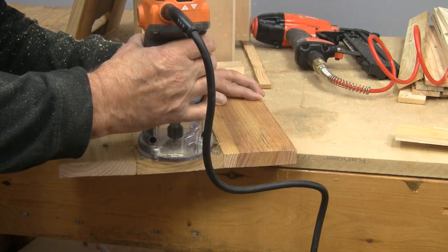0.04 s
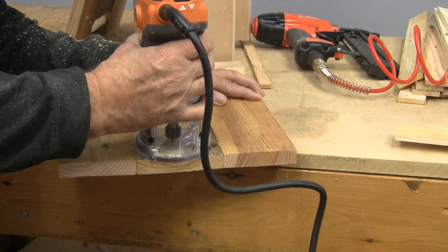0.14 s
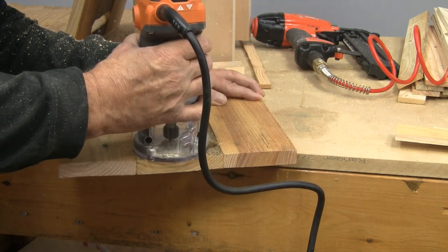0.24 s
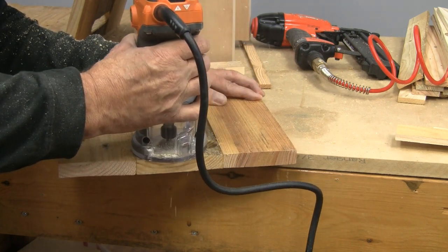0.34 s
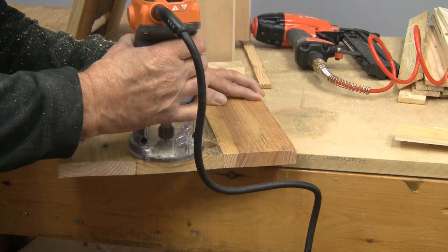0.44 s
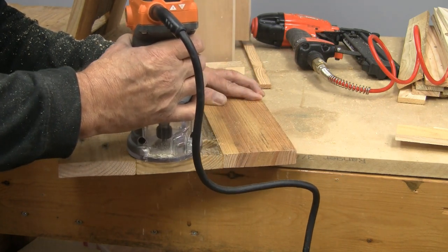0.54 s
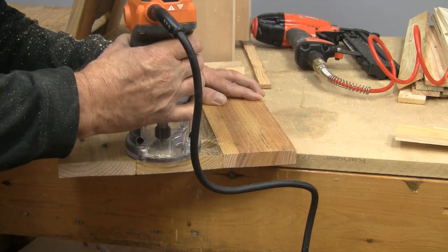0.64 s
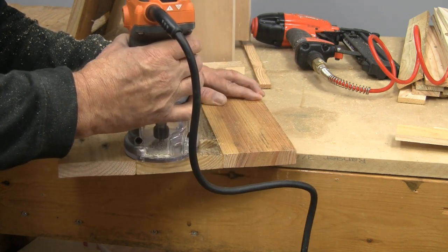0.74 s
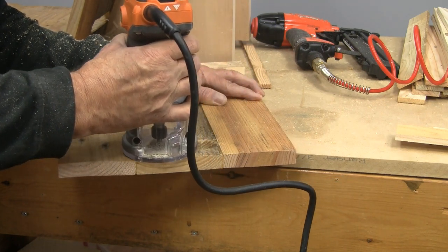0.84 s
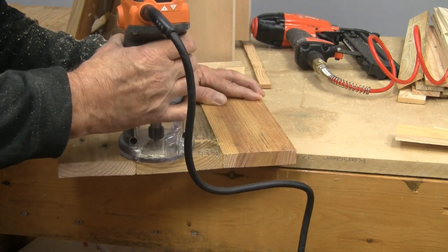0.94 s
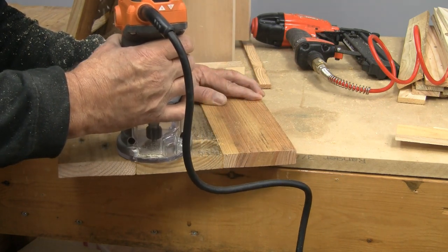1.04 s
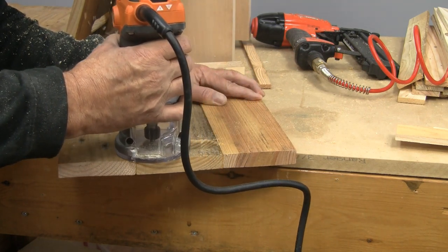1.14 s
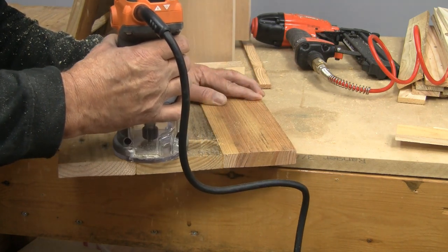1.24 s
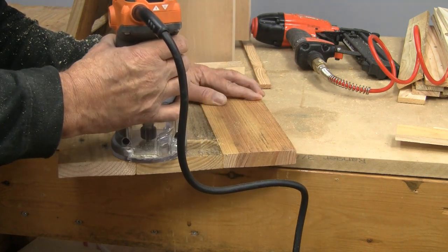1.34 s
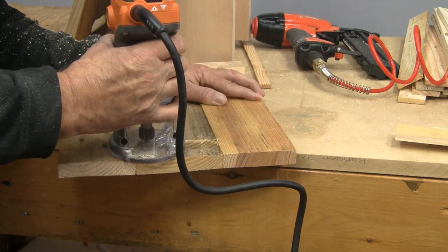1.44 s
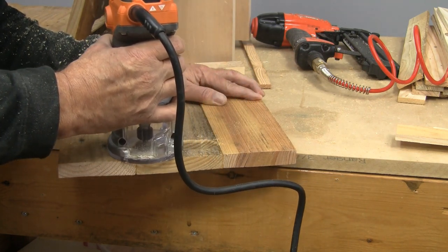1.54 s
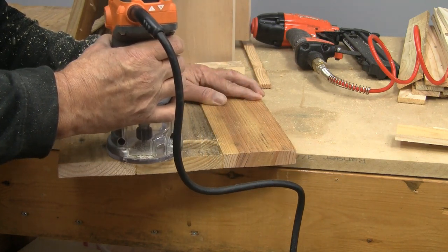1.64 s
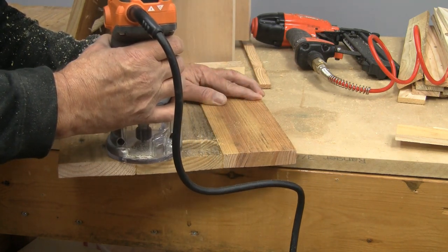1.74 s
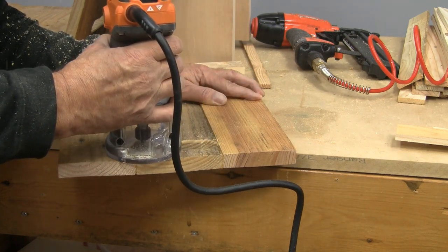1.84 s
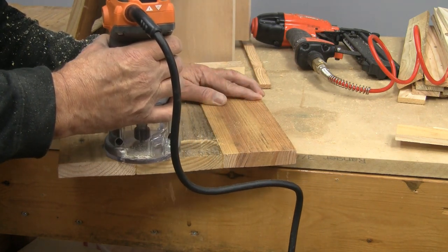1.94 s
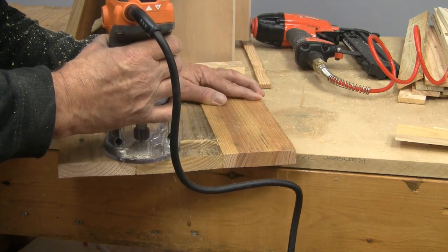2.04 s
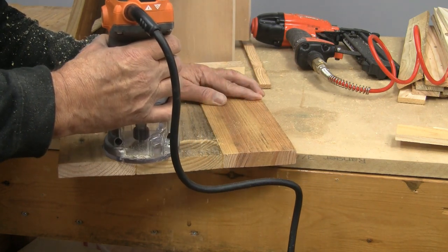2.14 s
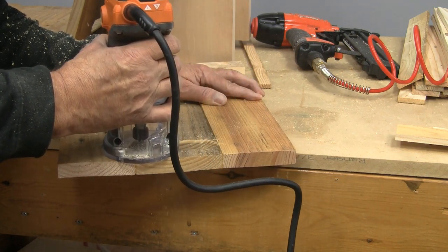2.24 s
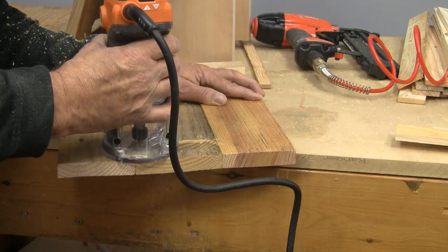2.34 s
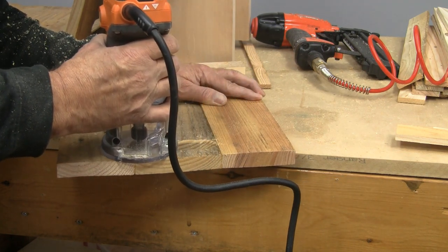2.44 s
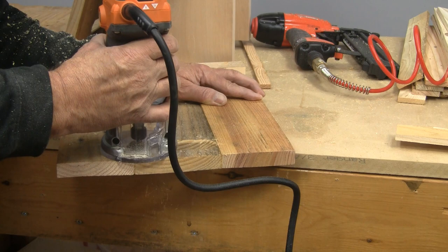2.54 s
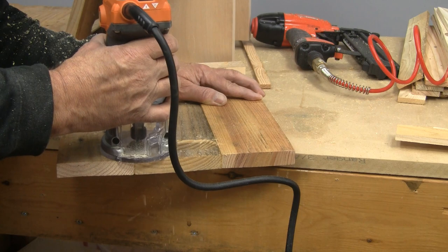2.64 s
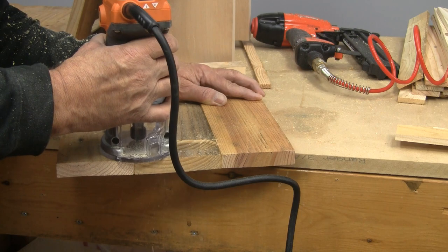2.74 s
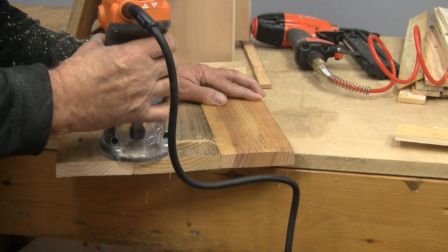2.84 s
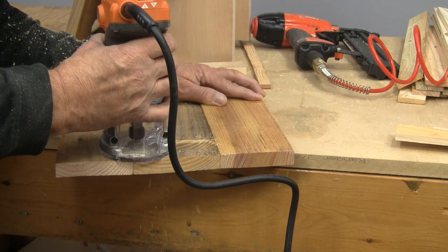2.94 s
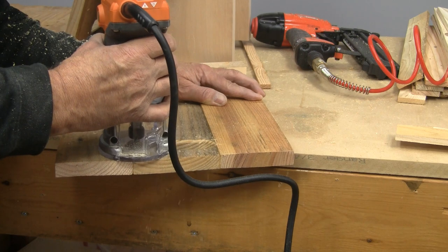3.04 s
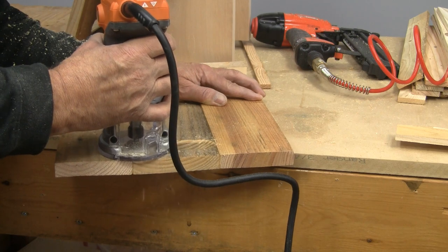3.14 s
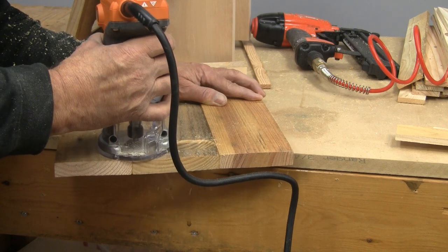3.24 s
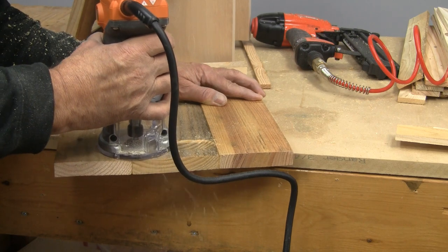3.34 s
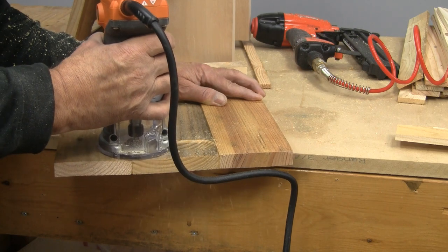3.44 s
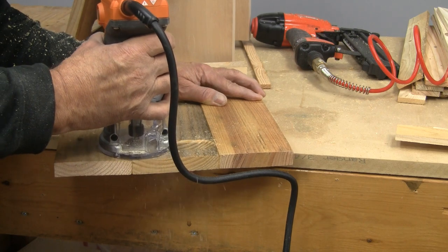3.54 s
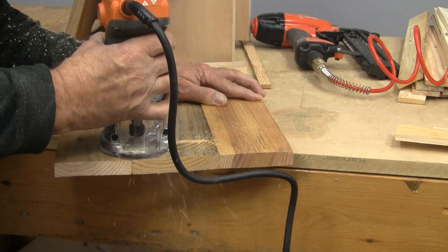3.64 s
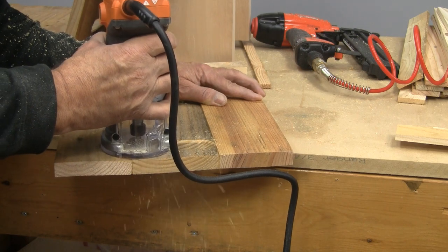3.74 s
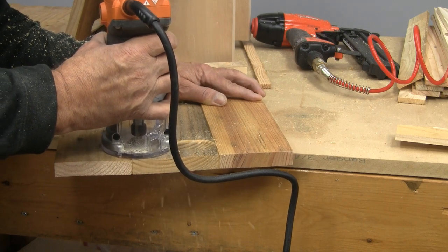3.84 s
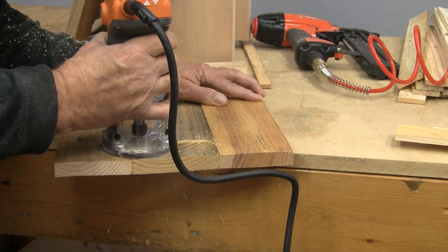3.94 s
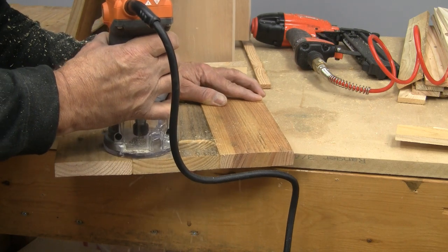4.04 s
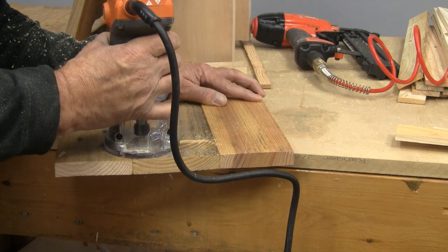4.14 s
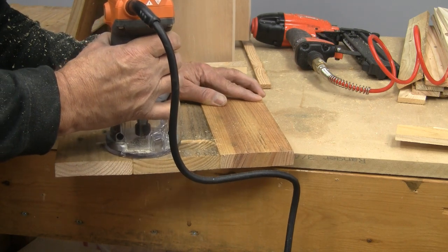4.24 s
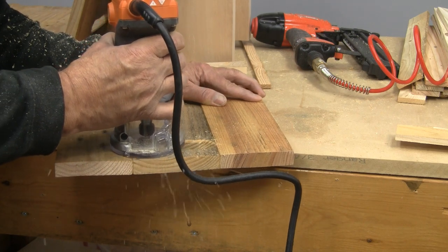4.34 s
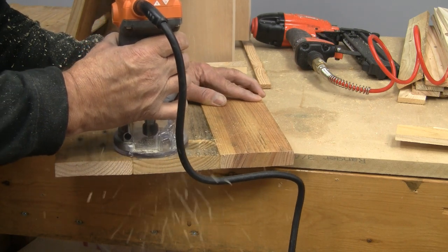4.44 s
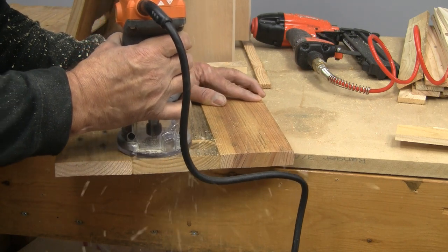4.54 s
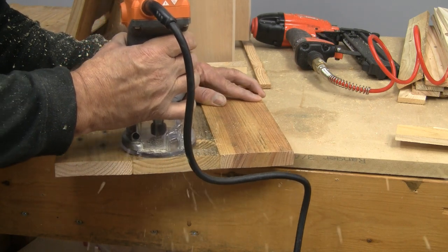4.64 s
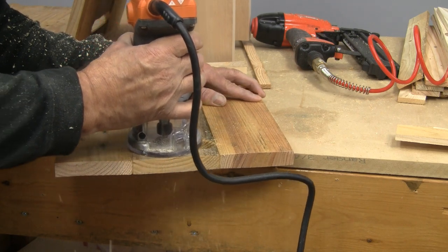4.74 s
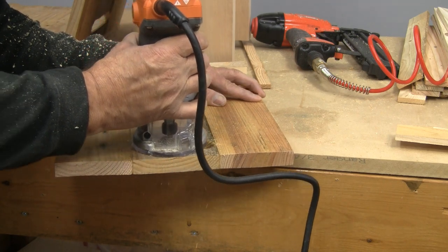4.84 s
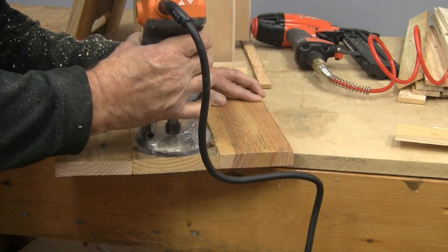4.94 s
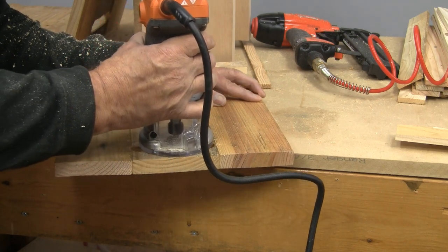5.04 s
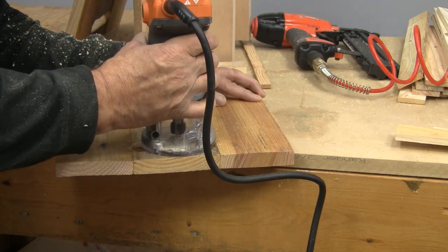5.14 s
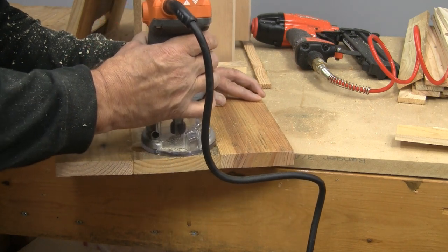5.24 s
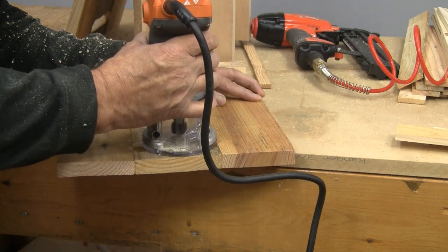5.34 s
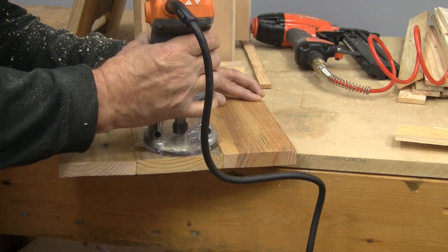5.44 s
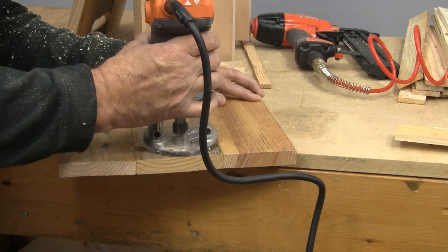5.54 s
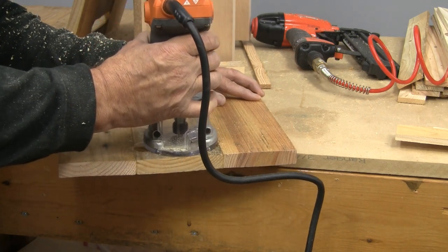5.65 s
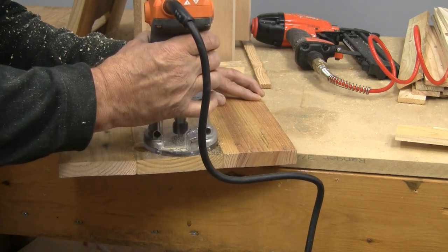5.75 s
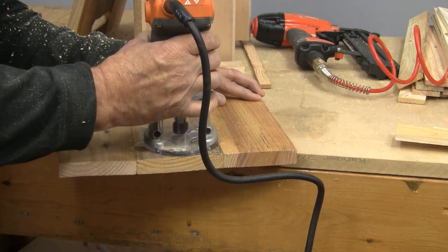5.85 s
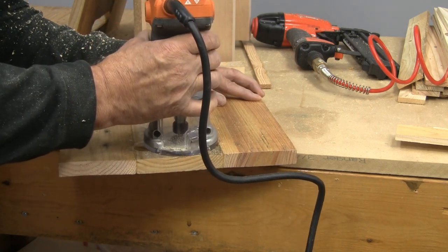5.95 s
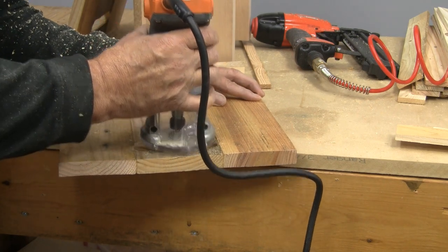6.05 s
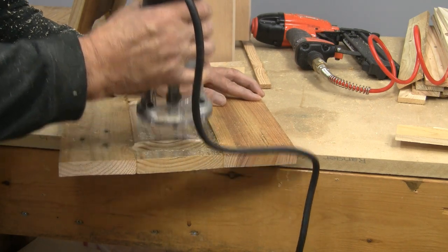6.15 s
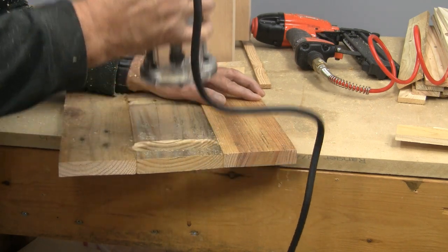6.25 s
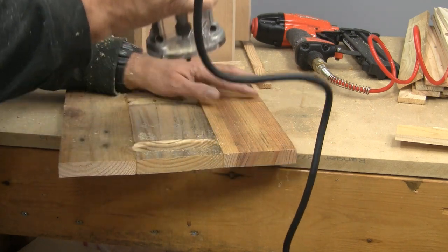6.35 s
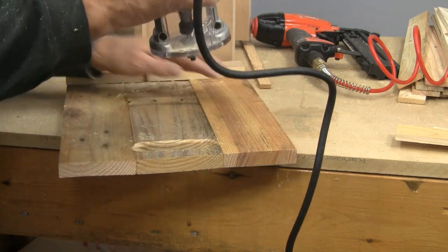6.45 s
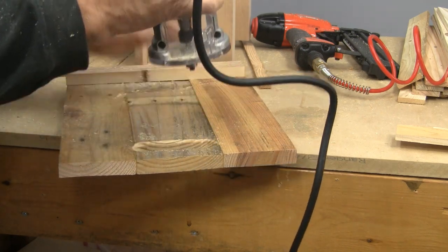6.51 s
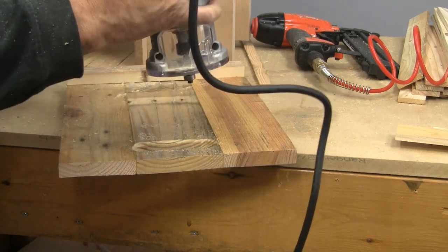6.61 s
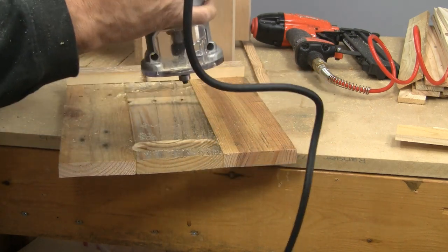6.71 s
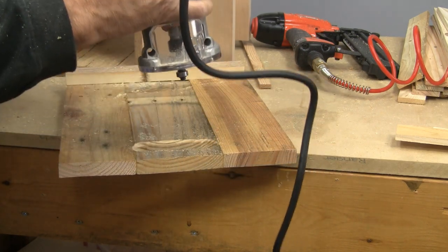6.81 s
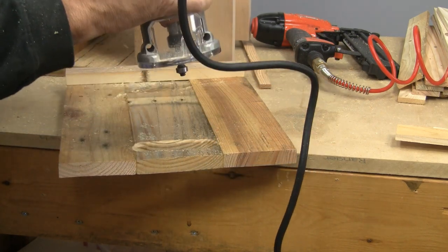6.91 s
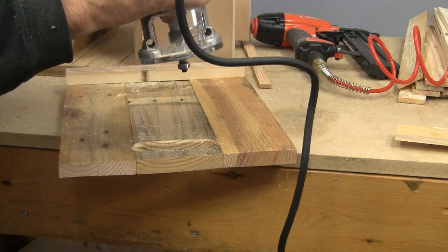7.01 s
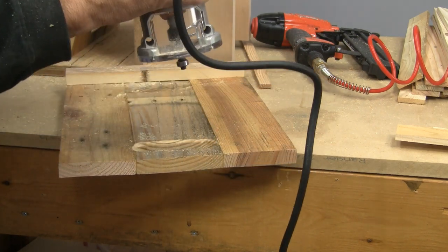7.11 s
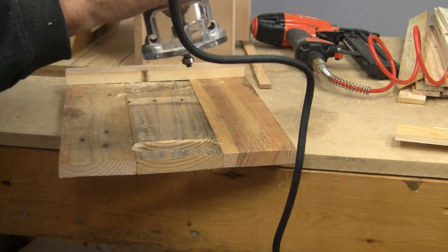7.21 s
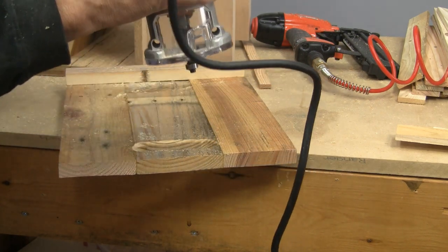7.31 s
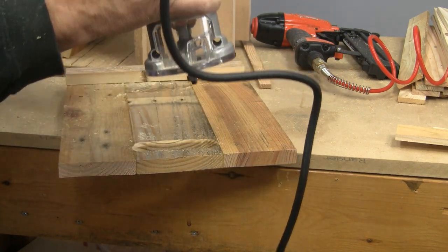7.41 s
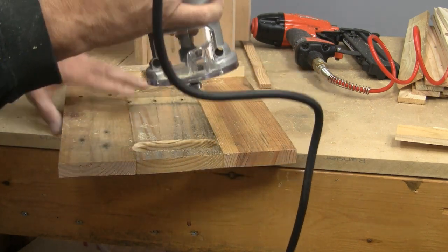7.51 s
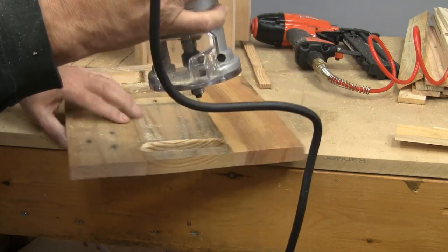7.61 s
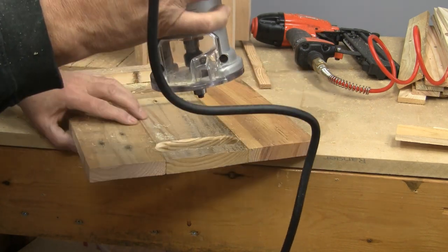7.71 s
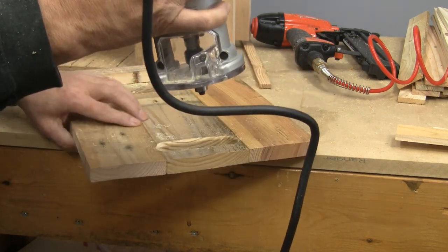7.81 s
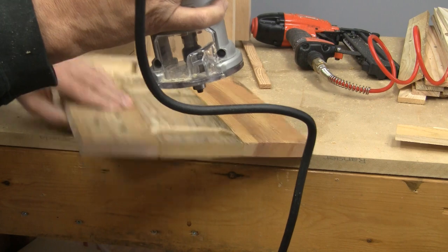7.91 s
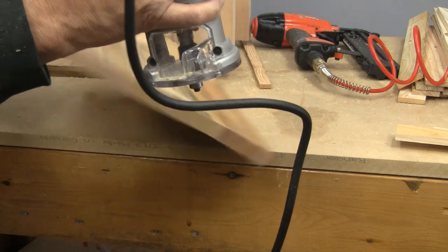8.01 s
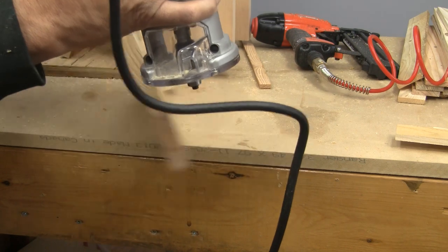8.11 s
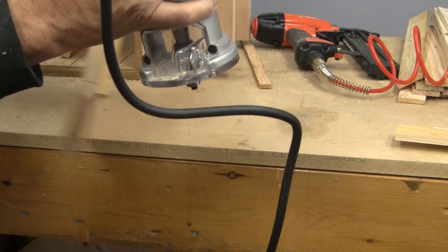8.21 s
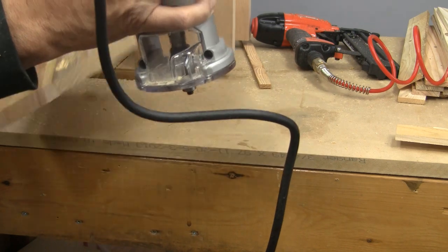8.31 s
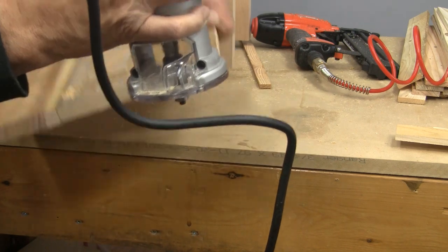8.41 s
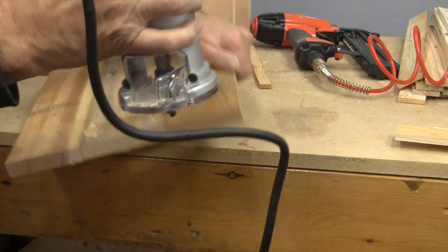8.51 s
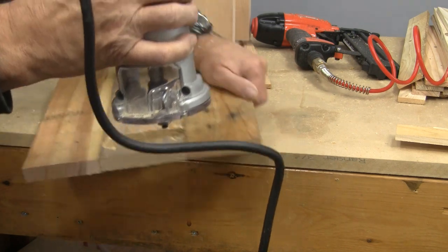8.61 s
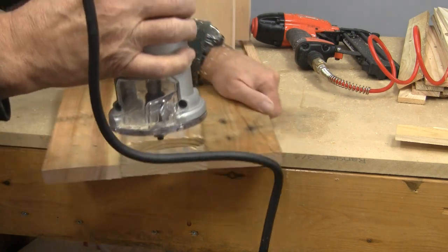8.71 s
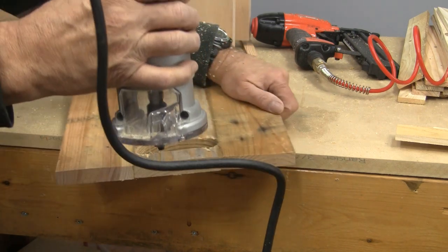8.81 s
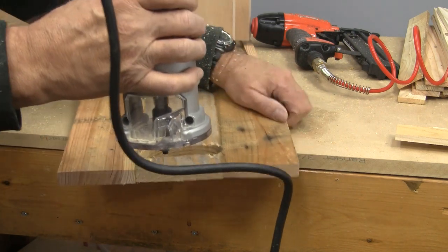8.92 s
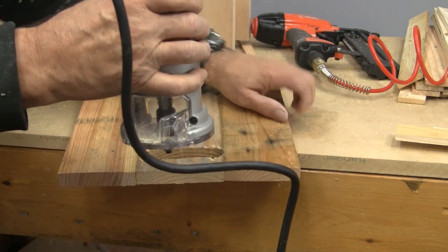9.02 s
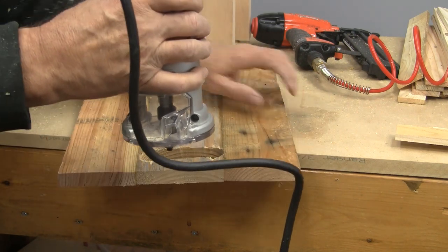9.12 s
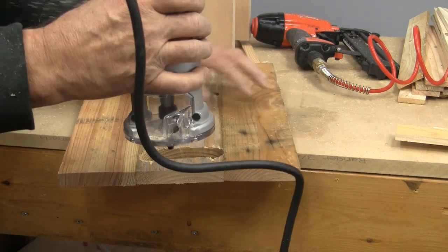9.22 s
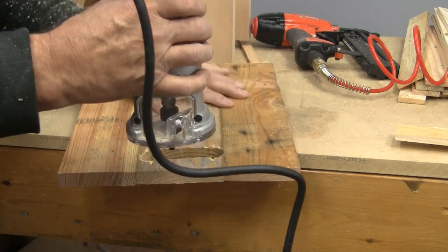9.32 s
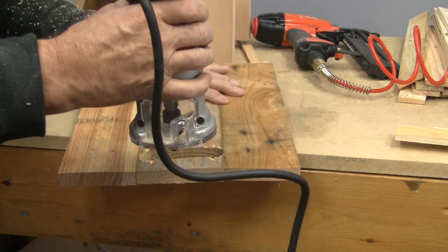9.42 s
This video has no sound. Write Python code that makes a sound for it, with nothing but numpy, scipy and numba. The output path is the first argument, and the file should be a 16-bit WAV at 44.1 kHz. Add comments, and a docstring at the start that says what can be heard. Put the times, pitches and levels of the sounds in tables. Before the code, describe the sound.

A hand-held router cuts wood with a high, rasping whine, then clicks off and slows amid a few wooden knocks.

```python
"""A hand-held trim router cuts a groove in a board, is lifted, switched off and coasts down.
Shaft orders whine through the board, the bit rasps, cooling air roars in the housing and the
brushes sing on the commutator. As the motor slows, the board is turned over and knocks on the
bench. One microphone in a small workshop."""
import sys
import numpy as np
from scipy import signal
from scipy.io import wavfile
from numba import njit

SR = 44100
rng = np.random.default_rng(int(sys.argv[2]) if len(sys.argv) > 2 else 0)


def wav_out(sig):
    """Save sig, one row per channel (or a flat mono array), as 16-bit PCM at SR to the path in sys.argv[1]."""
    wavfile.write(sys.argv[1], SR, np.round(np.clip(np.atleast_2d(sig).T, -1, 1) * 32767).astype(np.int16))


N = 417625
T = np.arange(N) / SR

# board blows: t/s, ring/dB, thud/dB, crack/dB (each relative), hardness/(dB/octave)
KNOCKS = [(7.61, -44, -53, -59, -19), (7.799, -37, -59, -50, -12), (7.937, -31, -42, -47, -13),
          (8.02, -32, -50.5, -55, -10), (8.5736, -1.5, -33, -18, 4), (8.589, -17, -40, -45, 5),
          (8.614, -12, -47, -49, -6), (8.63, -26, -48, -41, 4), (8.674, -7.5, -44, -39, -2),
          (8.688, -17, -44, -39, -6), (8.712, -11, -39, -40, -3), (9.014, -25.5, -46, -39, 5),
          (9.022, -24, -43, -42, 4.5), (9.052, -28, -48, -49, 2), (9.069, -30, -48, -43, 7),
          (9.096, -19, -45, -44, 6), (9.101, -13, -45, -39, 5), (9.117, -18.5, -39, -40, -7),
          (9.155, -31, -44, -46, -15), (9.4, -51, -72, -53, 9)]
# board modes: f/Hz, level/dB, t60/s
BOARD_MODES = [(190.9, -14, 0.063), (290, -13, 0.092), (390.6, 1, 0.078), (472.4, -1, 0.069),
               (531, 1.5, 0.042), (642, -6, 0.051), (738, -9.5, 0.04), (860, -8.5, 0.047),
               (1011, -6, 0.049), (1152, -7, 0.03), (1363, -6.5, 0.036), (1723, -14, 0.042),
               (2050, -21.5, 0.043)]
# switch body modes: f/Hz, level/dB, t60/s
SWITCH_MODES = [(1500, -17, .006), (3040, -12, .005), (5000, -12.5, .004), (6800, -13, .005)]
# centres of rumble, roar, rush, spray, hiss: f/Hz
AIR_HZ = 130, 800, 1450, 3800, 9500
# housing noise spectrum: f/Hz, relative density/dB
AIR_COLOUR = [(40, -64), (130, -45), (250, -27), (450, -18.5), (650, -14.5), (900, -7), (1150, -3),
              (1450, -9), (1900, -8.5), (2400, -10.5), (3500, -6.5), (8000, -17.5), (10000, -27),
              (12000, -35)]
# bench rumble: t/s, level/dB
RUMBLE = [(0, -83), (1.5, -76.5), (2.5, -82), (3.2, -72), (3.9, -68), (4.9, -78), (5.4, -72), (5.85, -71),
          (6.2, -93), (7.5, -101), (8.0, -63), (8.4, -89), (8.57, -102), (8.7, -54), (9.05, -60),
          (9.25, -71)]
# air noise at full speed, low to high band: t/s, level/dB
ROAR = [(0, -49.5), (1.3, -51), (1.8, -47.5), (2.2, -46), (2.8, -49), (3.8, -44), (4.5, -46.5), (4.9, -51),
        (5.85, -47), (6.2, -41), (6.9, -37.5), (7.5, -34)]
RUSH = [(0, -42), (1.5, -40.5), (2.6, -40), (2.85, -36), (3.4, -37.5), (3.85, -36), (4.25, -40), (4.6, -37),
        (5, -40), (5.25, -32), (5.7, -30.5), (6.2, -35), (6.6, -34.5), (7.1, -39)]
SPRAY = [(0, -35), (.2, -42), (1.15, -39), (1.45, -34.5), (1.7, -36), (1.85, -37.5), (1.95, -41.5),
         (2.6, -43.5), (2.85, -40.5), (3.6, -42), (4, -36.5), (4.38, -39), (4.46, -33), (4.6, -39),
         (4.8, -41), (5.3, -43), (5.5, -37), (6.2, -38), (6.9, -37)]
HISS = [(0, -48), (1.2, -52), (1.6, -48), (2.6, -49.5), (2.85, -47.5), (3.9, -45), (4.3, -49), (4.8, -46),
        (5.15, -46), (5.3, -48), (5.6, -43.5), (5.9, -46), (6.2, -41.5), (7.1, -43.5)]
# roar to hiss, a row each: slope/(dB per dB of speed), board rub/dB, room floor/dB
WIND_DOWN = [(2.0, -69.5, -75), (2.0, -62, -72), (2.0, -61, -66), (2.0, -61.5, -70.5)]
# housing cavities: f/Hz, width/Hz, level/dB re roar
CAVITIES = [(900, 170, 5), (1290, 120, -4), (2000, 200, -2)]
# armature slot and commutator bar lines: order, level/dB
BAR_LINES = [(12, -4), (24, 2), (25, -10), (36, -8), (48, -4), (59, -12), (60, -9), (61, -12), (72, -9),
             (84, -12), (96, -7), (120, -10)]
# their common level: t/s, level/dB
BAR_LEVEL = [(0, -44), (7.1, -45), (7.3, -39.5), (7.8, -41), (8.2, -43.5), (8.55, -44.5), (8.8, -47),
             (9, -52.5), (9.3, -68)]
# their offset under current: order -> gain/dB
LIVE_BARS_DB = {24: 0, 25: -5}
# motor can radiation: f/Hz, gain/dB
CAN_RESPONSE = [(500, -16), (1500, -10), (2100, 2), (2600, 1), (3700, -4), (5000, 0), (6000, -5), (6900, 1),
                (8300, -4), (9300, -7), (10500, -24)]
# bit digs in: t/s, sigma/s, level/dB
RASPS = [(0.9, .06, -43), (1.4, 0.17, -42), (4.47, 0.049, -45)]
# rasp lines: order -> level/dB
RASP_LINES_DB = {8.5: -1, 9.5: 1, 10.5: -5, 11.5: -3, 12.5: 2, 13.5: -4, 14.5: -5, 15.5: -1, 16.5: -5}
# bit judders: t/s, level/dB
JUDDERS = [(3.82, -45), (4.599, -55.5)]
# shaft before coast-down scaling: t/s, f/Hz, first order level/dB
SHAFT = [(0, 312.1, -30.5), (.7, 312.5, -31), (1.2, 312.7, -28), (1.52, 316.5, -27.5), (1.7, 312, -28.5),
         (2.25, 309.7, -37), (2.95, 315, -34.5), (3.22, 319.1, -28), (3.35, 316.2, -24.5),
         (3.6, 317.5, -23.5), (3.8, 314.4, -29.5), (3.9, 314.5, -39), (4.1, 312.7, -43), (4.22, 312, -30.5),
         (4.33, 313.3, -30.5), (4.41, 312.4, -36), (4.47, 308.2, -30), (4.62, 306.5, -32),
         (4.75, 308.9, -35.5), (4.84, 311.6, -51), (4.95, 315.2, -33.5), (4.995, 316, -41),
         (5.04, 318, -31.5), (5.3, 323.9, -35.5), (5.6, 327.3, -43.5), (6.0, 330.8, -41.5),
         (6.1, 331.7, -62), (6.6, 331.4, -48.5), (7.11, 332, -49), (7.15, 331.6, -62), (7.2, 332.5, -50.5),
         (7.7, 333, -53)]
# main multiples of the shaft rate: order
MAIN_ORDERS = 1, 2, 3, 4, 5, 6, 7, 8, 10, 12, 14
# base levels of main orders from the second up: in wood/dB, lifted/dB
MAIN_BASE = [(-45, -40), (-38.5, -37.5), (-36.5, -40), (-35, -40.5), (-37.5, -39.5), (-38, -50),
             (-42.5, -47), (-40.5, -49), (-42.5, -49), (-45, -52)]
# upper order spectrum: order, level/dB re bite
UPPER_ORDERS = [(9, -14.5), (11, -20), (13, -21), (16, -20), (20, -24), (24, -31.5), (30, -31.5),
                (36, -35.5)]
# bit in wood: t/s, bite/dB, tilt/(dB/octave), even order gain from two flutes/dB
CUT = [(0, -21.5, -0.5, 1), (1.1, -20.5, 0, -3), (1.5, -15, -3.5, 5), (1.9, -20, -1.5, 3),
       (2.7, -19, -0.5, -4), (3.1, -22, 0.5, 5), (3.68, -23.5, 0.5, 0.5), (4.1, -18.5, 1, 0),
       (4.45, -20.5, 1, 10), (4.6, -19, 0.5, 1), (4.75, -15, -0.5, 9), (5.0, -18.5, 0.5, 3),
       (5.07, -16.5, 2, 6), (5.17, -11, -2, 3), (5.23, -20, -4, -2), (5.7, -21.5, -9, 9),
       (6.1, -25.5, 2.5, -3.5), (7.1, -27.5, 3.5, 4)]
# orders resonating in the board: t/s, length/s, order, level/dB
SINGS = [(0.0, 0.22, 9, -35.0), (0.0, 0.22, 10, -34.5), (0, 0.22, 15, -44), (0, 1.1, 7, -29.5),
         (0, 1.2, 6, -26.5), (0, 1.29, 4, -28.5), (0.02, 0.19, 12, -36.5), (0.0, 1.16, 14, -36.5),
         (0.39, 0.21, 9, -35), (0.4, 0.13, 10, -34), (0.55, 0.32, 16, -39.5), (0.55, 0.57, 17, -43.5),
         (0.57, 0.061, 10, -33), (0.6, 0.5, 22, -45.5), (0.73, 0.25, 9, -35), (0.56, 0.33, 13, -39.0),
         (0.63, 0.4, 11, -39), (0.82, 0.24, 5, -32.5), (0.85, 0.063, 10, -36), (0.951, 0.21, 13, -35),
         (1, 0.57, 2, -40), (1.06, 0.073, 10, -32), (1.19, 0.22, 10, -32), (1.234, 0.36, 12, -32),
         (1.24, 0.23, 7, -32.5), (1.24, 0.39, 8, -33.5), (1.252, 0.08, 11, -37), (1.2, 0.29, 9, -36.5),
         (1.31, 0.59, 14, -35.5), (1.26, 0.2, 13, -36.0), (1.39, 0.2, 10, -28), (1.56, 0.59, 4, -25.5),
         (1.58, 0.076, 5, -27.5), (1.59, 0.31, 9, -33), (1.61, 0.32, 13, -35), (1.62, 0.27, 10, -32.5),
         (1.7, 0.49, 7, -29.5), (1.73, 0.31, 8, -36), (1.8, 1.02, 5, -26.5), (1.855, 0.58, 6, -28.5),
         (1.952, 0.25, 22, -45), (2.15, 0.17, 10, -34.0), (2.154, 1.17, 4, -24.5), (2.2, 0.11, 9, -35),
         (2.2, 0.23, 14, -37), (2.381, 0.65, 3, -30.5), (2.55, 0.3, 13, -37.5), (2.81, 0.5, 10, -35.5),
         (2.8, 0.26, 11, -37), (2.825, 0.11, 9, -31.5), (3.03, 1.21, 5, -29.5), (3.08, 0.96, 3, -29),
         (3.11, 0.89, 2, -34), (3.17, 0.1, 24, -39), (3.17, 0.15, 9, -36), (3.39, 0.15, 24, -46),
         (3.431, 0.18, 8, -35.5), (3.58, 0.27, 4, -29.5), (3.836, 0.12, 8, -32), (3.85, 0.1, 24, -39),
         (3.86, 0.11, 12, -34), (3.89, 0.26, 6, -29.5), (3.93, 0.52, 4, -26.5), (3.98, 0.15, 13, -37.5),
         (4.039, 0.38, 8, -29), (4.06, 0.22, 10, -38), (4.139, 0.25, 12, -31.5), (4.167, 0.1, 18, -37),
         (4.2, 0.15, 15, -39.0), (4.26, 0.39, 2, -37), (4.18, 0.24, 14, -41), (4.302, 0.12, 6, -28),
         (4.435, 0.36, 3, -29.5), (4.443, 0.15, 10, -28.5), (4.47, 0.09, 14, -34), (4.49, 0.25, 5, -30.5),
         (4.52, 0.16, 8, -31.5), (4.533, 0.17, 4, -27), (4.56, 0.14, 22, -38), (4.58, 0.074, 12, -32),
         (4.58, 0.11, 20, -39), (4.601, 0.13, 16, -32), (4.63, 0.12, 17, -39.5), (4.63, 0.15, 10, -31),
         (4.65, 0.12, 14, -37), (4.67, 0.12, 9, -35), (4.7, 0.09, 18, -40.0), (4.72, 0.13, 8, -29),
         (4.76, 0.22, 24, -40), (4.77, 0.12, 26, -37), (4.78, 0.14, 22, -40), (4.79, 0.1, 16, -31),
         (4.8, 0.34, 5, -30.5), (4.81, 0.19, 6, -27), (4.82, 0.059, 12, -34), (4.82, 0.23, 4, -30),
         (4.831, 0.14, 18, -37), (4.86, 0.14, 8, -26), (4.919, 0.11, 12, -32.5), (4.99, 0.35, 3, -31.5),
         (5.019, 0.17, 25, -40), (5.034, 0.16, 16, -33), (5.06, 0.15, 14, -36), (5.06, 0.15, 8, -30),
         (5.07, 0.06, 12, -38), (5.07, 0.12, 20, -37), (5.093, 0.1, 10, -30), (5.099, 0.089, 15, -39.5),
         (5.104, 0.44, 5, -26.5), (5.178, 0.22, 7, -30), (5.18, 0.33, 4, -29), (5.289, 0.048, 8, -29),
         (5.41, 0.48, 6, -31.5), (5.462, 0.34, 5, -31.5), (5.466, 0.27, 3, -31), (5.505, 0.51, 4, -24.5),
         (5.54, 0.67, 2, -34), (6.01, 0.16, 24, -42.0), (6.5, 0.21, 12, -41)]
# magnetic sidebands: t/s, lower sideband level/dB
MAINS_LEVEL = [(0, -65.5), (3, -64.5), (4, -52), (5.5, -55.5), (6, -62), (6.3, -75), (7.1, -82)]

LIFT_S, LIFT_RAMP_S = 6.0, 0.07
SWITCH_S, SNAP_DB, RING_DELAY_S = 7.109, -5, .0006
COAST_S, COAST_EXPONENT = 2.84, 1.77
BITE_SHARE, BITE_REF_DB, BITE_FADE_DB_PER_S = 0.73, -19.5, 69
SING_EDGE_S = 0.041
JUDDER_SIGMA_S, JUDDER_BASE_DB = 0.067, -74
RUB_FROM_S, RUB_TO_S, RUB_EDGE_S = 8.0, 9.1, 0.13
END_DIP_S, END_DIP_SIGMA_S, END_DIP_DB = 9.6, 0.086, -1
SHOP_T60_S, SHOP_DB = 0.3, -12
DUCK_ABOVE_DB, DUCK_RATIO, DUCK_ATTACK_S, DUCK_RELEASE_S = -10, 3, 0.0011, 0.094
TOP_HZ = 11900


def undb(db):
    return np.exp(np.asarray(db) * np.log(10) / 20)


def power_sum_db(*db):
    return 20 * np.log10(np.sqrt(sum(undb(d) ** 2 for d in db)))


def curves(rows):
    """Table columns, linearly interpolated over time."""
    t_s, *columns = np.transpose(rows)
    return [np.interp(T, t_s, c) for c in columns]


def ramp(start_s, length_s):
    return np.clip((T - start_s) / length_s, 0, 1)


def bump(centre_s, sigma_s):
    return np.exp(-((T - centre_s) / sigma_s) ** 2 / 2)


def burst(start_s, db, decay_s):
    return undb(db) * (T >= start_s) * np.exp(-np.maximum(T - start_s, 0) / decay_s)


def walk(rate_hz):
    """Piecewise linear noise, spread near 1."""
    count = int(rate_hz * N / SR) + 2
    return 1.426 * np.interp(T * rate_hz, np.arange(count), rng.standard_normal(count))


def tone(cycles, rms_db):
    return np.sqrt(2) * undb(rms_db) * np.sin(2 * np.pi * (cycles + rng.random()))


@njit
def bandpass(x, hz, width_hz):
    """State-variable filter, unity gain at centre."""
    y, band, low = np.empty(len(x)), 0., 0.
    g, k = np.tan(np.pi * hz / SR), width_hz / hz
    for i in range(len(x)):
        v = (band + g * (x[i] - low)) / (1 + g * (g + k))
        band, low, y[i] = 2 * v - band, low + 2 * g * v, k * v
    return y


def noise_band(hz, width_hz):
    """Band noise, unit rms."""
    band = bandpass(bandpass(rng.standard_normal(N), hz, width_hz), hz, width_hz)
    return band / band.std()


@njit
def peak_envelope(x, attack_s, release_s):
    attack, release = 1 / (attack_s * SR), 1 / (release_s * SR)
    level, out = 0., np.empty(len(x))
    for i in range(len(x)):
        level += (abs(x[i]) - level) * (attack if abs(x[i]) > level else release)
        out[i] = level
    return out


def coast():
    """Fraction of full speed; falls after switch-off."""
    return (1 - ramp(SWITCH_S, COAST_S)) ** COAST_EXPONENT


def shop_reverb(x):
    """Diffuse, decaying workshop reflections."""
    echo = bandpass(rng.standard_normal(SR // 2), 500., 2210.)
    echo *= np.exp(-np.log(1000) * T[:SR // 2] / SHOP_T60_S)
    echo[:200] = 0  # pre-delay
    return undb(SHOP_DB) * signal.fftconvolve(x, echo / np.sqrt(np.sum(echo ** 2)))[:N]


def board_knocks():
    """Each blow reweights the board's modes; the bench thuds, the edge cracks, the shop answers."""
    t_s, out = T[:SR // 3], np.zeros(N + SR)
    hz, mode_db, t60_s = np.transpose(BOARD_MODES)[:, :, None]
    onset = np.minimum(t_s / 0.0014, 1) ** 2  # edge lands gradually
    edge_sos = signal.butter(4, (600, 3100), "band", fs=SR, output="sos")
    scatter = rng.standard_normal((len(KNOCKS), 3, len(BOARD_MODES), 1))
    for (start_s, ring_db, thud_db, crack_db, tilt_db), (gain, detune, phase) in zip(KNOCKS, scatter):
        weight = undb(mode_db + tilt_db * np.log2(hz / 450) + 2.13 * gain)
        modes = weight * np.sin(2 * np.pi * (hz * (1 + 0.024 * detune) * t_s + 0.18 * phase))
        ring = (modes * np.exp(-np.log(1000) * t_s / t60_s)).sum(axis=0) * undb(ring_db - 6)
        thud = undb(thud_db) * np.sin(2 * np.pi * 95 * t_s) * np.exp(-t_s / 0.02)
        contact = rng.standard_normal(len(t_s)) * np.exp(-t_s / 0.0071)
        crack = signal.sosfilt(edge_sos, contact) * undb(crack_db + 14)
        slap = bandpass(rng.standard_normal(len(t_s)), 3500., 3000.) * np.exp(-t_s / 0.003)
        slap *= undb(2 * crack_db + 13)  # square law: favours the hardest blow
        i = int(start_s * SR)
        out[i:i + len(t_s)] += onset * (ring + thud + crack + slap)
    return out[:N] + shop_reverb(out)


def switch():
    """The plastic body rings briefly over a noise snap and a small thump."""
    ring_s = SWITCH_S + RING_DELAY_S
    ring = sum(burst(ring_s, db, t60_s / np.log(1000)) * np.sin(2 * np.pi * hz * (T - ring_s))
               for hz, db, t60_s in SWITCH_MODES)
    noise = burst(SWITCH_S, SNAP_DB, 0.0012) * rng.standard_normal(N)
    snap = bandpass(bandpass(noise, 4540., 6000.), 4500., 5970.)
    thump = bandpass(burst(SWITCH_S, -43.5, 0.0018), 90., 147.5)
    return ring + snap + thump


def air_levels_db():
    """Rumble, then four air bands that fall with speed, over board rub and room floor."""
    speed_db = 20 * np.log10(coast())
    rub_gate_db = -30 * (1 - ramp(RUB_FROM_S, RUB_EDGE_S) + ramp(RUB_TO_S, RUB_EDGE_S))
    dip_db = END_DIP_DB * bump(END_DIP_S, END_DIP_SIGMA_S)
    bands_db = [power_sum_db(curves(rows)[0] + slope * speed_db + dip_db, rub_db + rub_gate_db, room_db)
                for rows, (slope, rub_db, room_db) in zip((ROAR, RUSH, SPRAY, HISS), WIND_DOWN)]
    return np.array(curves(RUMBLE) + bands_db)


def housing_cavities():
    """The air stream excites the cavities: a fluttering roar."""
    roar_db = air_levels_db()[1]
    return sum(noise_band(float(hz), 1.9 * width_hz) * undb(roar_db + db + 2.07 * walk(18))
               for hz, width_hz, db in CAVITIES)


def cooling_air(turns):
    """Flickering third-octave turbulence, coloured by the housing, throbbing once a turn."""
    colour_hz, colour_db = np.transpose(AIR_COLOUR)
    levels_db = air_levels_db()
    gust_db, out = 0.18 * walk(3.8), 0
    for hz in 57 * 2 ** np.arange(0, 7.8, 1 / 3):
        weights = np.array([np.interp(np.log(hz), np.log(AIR_HZ), row) for row in np.eye(5)])
        points_hz = [hz, *AIR_HZ]
        power_db = np.interp(np.log(points_hz), np.log(colour_hz), colour_db) + 10 * np.log10(points_hz)
        housing_db = power_db[0] - weights @ power_db[1:]
        db = weights @ levels_db + housing_db + gust_db + 1.37 * walk(12)
        out += undb(db) * noise_band(hz, hz / 3)
    return out * (1 + 0.16 * np.cos(2 * np.pi * turns))


def commutator(shaft_hz, turns):
    """Brushes tick over uneven bars: rough lines, patchier once the current is off."""
    level_db = curves(BAR_LEVEL)[0]
    uneven_turns = turns + .0025 * np.sin(2 * np.pi * turns) + .001 * walk(120)
    out = 0
    for k, db in BAR_LINES:
        patchy_db = (.6 + .4 * ramp(SWITCH_S, .2)) * (2.5 * walk(60) - 4 * np.abs(walk(8)))
        live_db = LIVE_BARS_DB.get(k, 0) * (T < SWITCH_S)
        can_db = np.interp(k * shaft_hz, *np.transpose(CAN_RESPONSE))
        line = tone(k * uneven_turns, level_db + db + live_db + can_db + patchy_db)
        out += line * (k * shaft_hz < TOP_HZ)
    return out


def magnetic_pull(turns):
    """Pull at twice the mains rate beats with the shaft: two sidebands."""
    level_db = curves(MAINS_LEVEL)[0]
    return sum(tone(turns + offset_hz * T, level_db + db + 3 * walk(6))
               for offset_hz, db in ((-120, 0), (120, -4)))


def bit_judder(turns, fade_db):
    """The bit judders at half shaft speed."""
    base_db = JUDDER_BASE_DB - 12 * ramp(LIFT_S, LIFT_RAMP_S) + fade_db
    swell_db = sum((db - JUDDER_BASE_DB) * bump(t_s, JUDDER_SIGMA_S) for t_s, db in JUDDERS)
    return sum(tone(k * turns, base_db + swell_db + 2.5 * walk(12)) for k in (.5, 1.5))


def bit_rasp(turns):
    """The bit digs in and alternate turns differ: lines halfway between orders."""
    swell = sum(undb(db) * bump(t_s, sigma_s) for t_s, sigma_s, db in RASPS)
    return swell * sum(tone(k * turns, db + 2.5 * walk(14)) for k, db in RASP_LINES_DB.items())


def sing_db(k, level_db):
    """Order k moves to its listed level while it resonates in the board."""
    for start_s, length_s, order, db in SINGS:
        if order == k:
            rise_s = start_s - SING_EDGE_S / 2
            gate = ramp(rise_s, SING_EDGE_S) - ramp(rise_s + length_s, SING_EDGE_S)
            level_db = level_db + gate * (db - level_db)
    return level_db


def upper_whine(turns):
    """Upper orders follow the bite; they fade after switch-off."""
    bite_db, tilt_db, even_db = curves(CUT)
    bite_db -= BITE_FADE_DB_PER_S * np.maximum(T - SWITCH_S, 0)
    out = 0
    for k in sorted(set(range(9, 37)) - set(MAIN_ORDERS)):
        db = np.interp(k, *np.transpose(UPPER_ORDERS)) + bite_db
        db += tilt_db * np.log2(k / 9) + even_db * (k % 2 == 0)
        db -= 4.5 * np.abs(walk(2.5))  # sound paths cancel
        db -= (1.5 + 0.9 * np.abs(even_db)) * np.abs(walk(14))  # flute chatter
        out += tone(k * turns, sing_db(k, db) + 2.1 * walk(24))
    return out


def main_whine(turns, fade_db):
    """Main shaft orders shift as the bit lifts; on coast-down the highest fade first."""
    first_db = curves(SHAFT)[1]
    bite_db, _, even_db = curves(CUT)
    lifted = ramp(LIFT_S, LIFT_RAMP_S)
    levels_db, out = [first_db], 0
    for k, (wood_db, clear_db) in zip(MAIN_ORDERS[1:], MAIN_BASE):
        cutting_db = wood_db + BITE_SHARE * (bite_db - BITE_REF_DB) * (k > 7)
        levels_db.append(cutting_db + lifted * (clear_db - cutting_db))
    for k, db in zip(MAIN_ORDERS, levels_db):
        flicker_db = 1.02 * walk(25) + (0.48 + 0.063 * k) * walk(5)
        chatter_db = 0.21 * (k > 7) * np.abs(even_db) * (.8 - np.abs(walk(20)))
        out += tone(k * turns, sing_db(k, db) + k * fade_db + flicker_db + chatter_db)
    return out


def scene():
    """Router on one shaft phase, plus switch and board; dual mono."""
    shaft_hz = curves(SHAFT)[0] * coast()
    turns = np.cumsum(shaft_hz * (1 + 0.00065 * walk(40))) / SR
    fade_db = -800 * (1 - coast()) ** 4
    mono = main_whine(turns, fade_db) + upper_whine(turns) + bit_judder(turns, fade_db)
    mono += magnetic_pull(turns) + bit_rasp(turns) + commutator(shaft_hz, turns)
    mono += cooling_air(turns) + housing_cavities() + switch() + board_knocks()
    return np.array([mono, mono])


def record(dry):
    """Microphone chain: bass cut, late ducking after peaks, soft clip, low-pass."""
    ceiling, lag = .37, int(.004 * SR)
    dry = signal.sosfilt(signal.butter(2, 30, "high", fs=SR, output="sos"), dry)
    peak = peak_envelope(dry[0], DUCK_ATTACK_S, DUCK_RELEASE_S)
    gain = np.minimum(undb(DUCK_ABOVE_DB) / (peak + 1e-9), 1) ** (1 - 1 / DUCK_RATIO)
    ducked = dry * np.concatenate([np.ones(lag), gain[:-lag]])
    clipped = ducked / (1 + np.abs(ducked / ceiling) ** 6) ** (1 / 6)
    return signal.sosfilt(signal.ellip(10, .2, 60, TOP_HZ, fs=SR, output="sos"), clipped)


dry = scene()
out = record(dry)
wav_out(out)
```